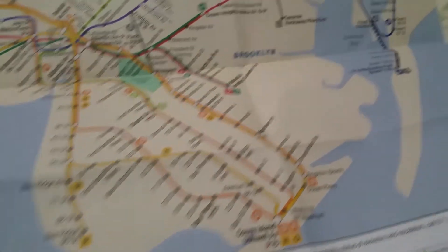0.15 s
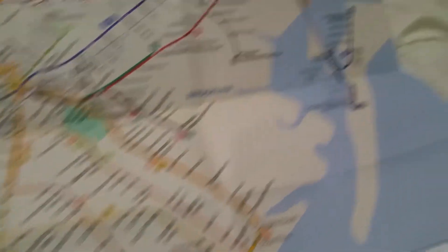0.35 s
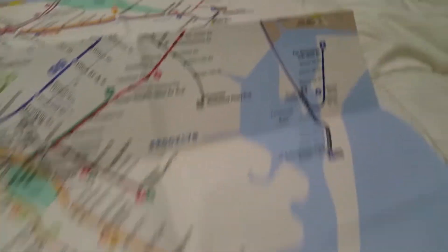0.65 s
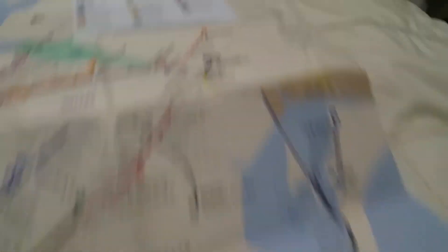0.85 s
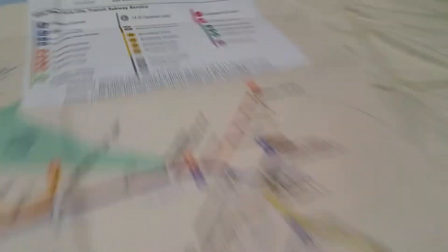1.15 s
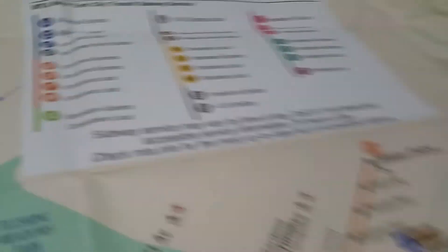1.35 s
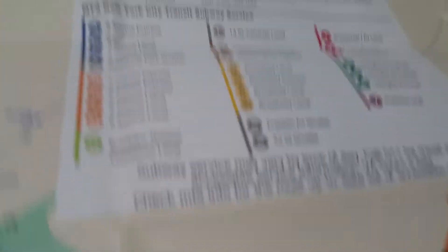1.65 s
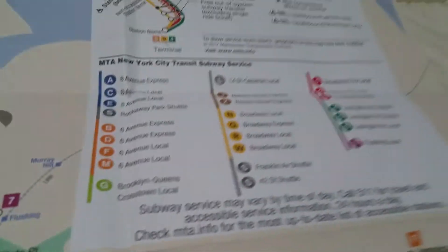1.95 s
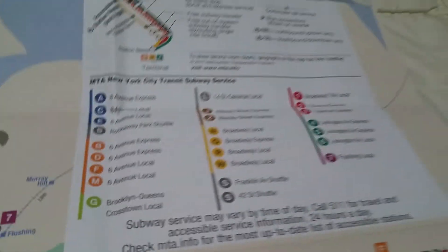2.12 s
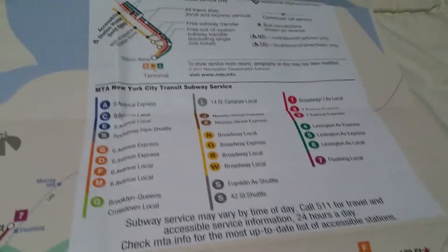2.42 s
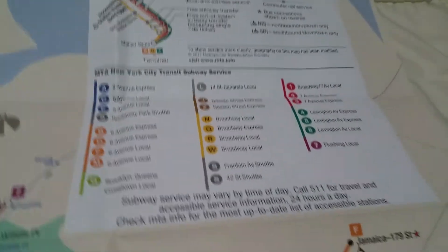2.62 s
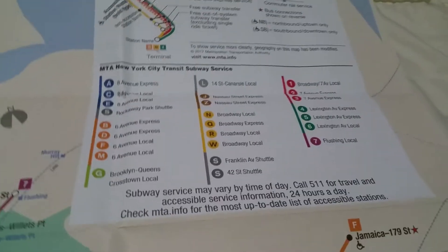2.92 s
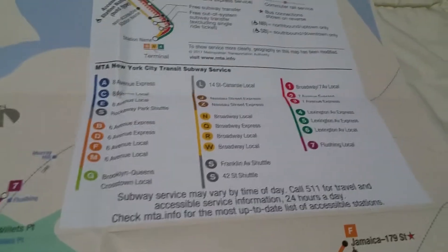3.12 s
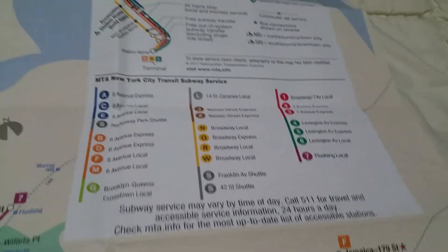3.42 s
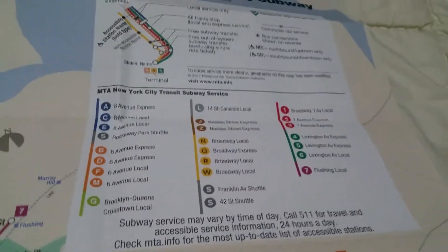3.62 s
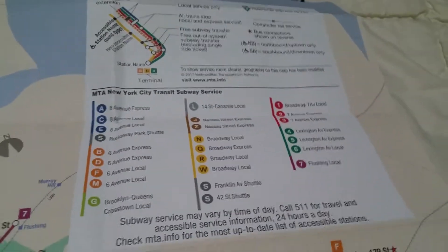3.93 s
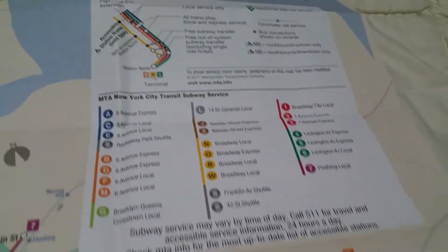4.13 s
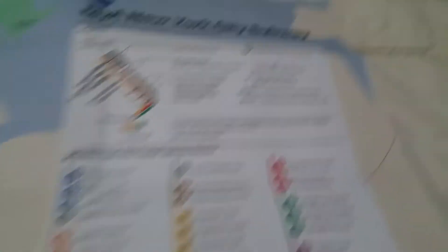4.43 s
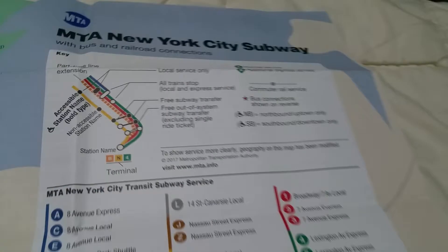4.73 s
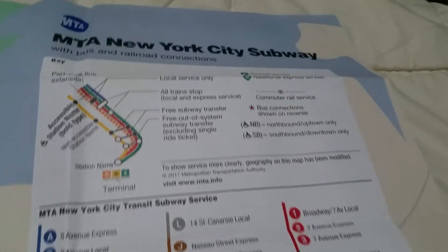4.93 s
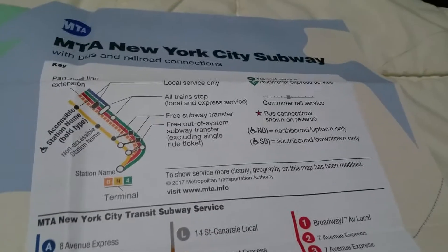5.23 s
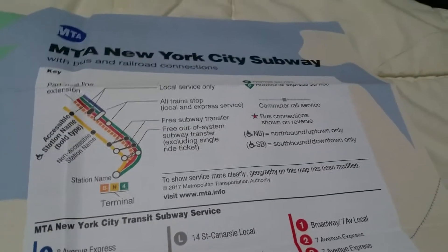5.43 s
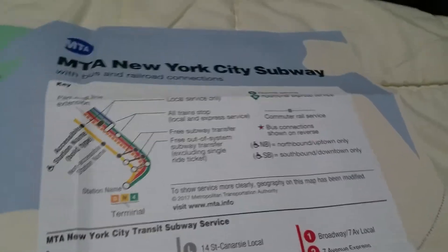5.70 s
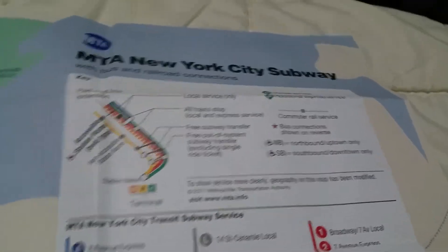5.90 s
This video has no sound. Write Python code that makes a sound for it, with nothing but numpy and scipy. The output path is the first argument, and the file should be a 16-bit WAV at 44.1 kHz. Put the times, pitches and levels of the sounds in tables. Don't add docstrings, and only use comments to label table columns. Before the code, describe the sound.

A big folded paper sheet is handled on a quilt in a quiet bedroom. Soft rustling and low air puffs lead to a sharp crack just after one second, then a hollow, booming crumple and several crisp snaps until about two seconds. Afterwards only small crinkles and ticks break the low room rumble and faint hiss. Close hand-held stereo pickup, fairly dry, with very faint wall echoes.

```python
import sys
import numpy as np
from scipy import signal
from scipy.io import wavfile
from scipy.ndimage import uniform_filter1d

SR = 44100
rng = np.random.default_rng(int(sys.argv[2]) if len(sys.argv) > 2 else 0)


def invert_db(x):
    u = np.asarray(x, float) / 20
    return 10 ** u


def generate_wav(sig):
    pcm = np.round(np.clip(np.atleast_2d(sig).T, -1, 1) * 32767).astype(np.int16)
    wavfile.write(sys.argv[1], SR, pcm)


N = 267290

# (frequency [Hz], likeness [-1 to 1])
NEAR = [(100, 0.93), (400, 0.9), (1000, 0.54), (2500, 0.14), (6000, 0.19), (14000, 0.12)]
# (time [s], left-right balance [dB])
PLACE = [(0, -2.5), (.6, 1), (.81, -3.5), (1.0, -0.5), (1.09, 3.5), (1.2, -0.5), (1.26, 2.5), (1.45, 0.33),
         (1.63, -3), (1.79, 2), (2.15, -0.5), (2.4, 0.8), (2.77, -0.9), (3.5, 0), (3.9, -1), (4.5, 0),
         (5.08, -2), (5.75, -2)]


def evened(x):
    return x / np.sqrt(np.mean(x ** 2) + 1e-20)


def read(points, hz):
    f, value = np.transpose(points)
    return np.interp(np.log(hz + 1), np.log(f + 1), value)


def add(mix, s, sound):
    part = mix[..., max(round(s * SR), 0):][..., :sound.shape[-1]]
    part += sound[..., :part.shape[-1]]


def resonate(x, hz, width):
    turn = np.exp(2j * np.pi * np.cumsum(hz * np.ones(x.shape[-1])) / SR)
    r = np.exp(-np.pi * width / SR)
    return 2 * (turn * signal.lfilter([1 - r], [1, -r], x / turn)).real


def placed(pair, pan_db):
    spacing_s = .00043
    lag = round(spacing_s * SR * np.tanh(np.mean(pan_db) / .8))
    pair = pair * invert_db(np.outer([.5, -.5], pan_db))
    return np.array([np.roll(pair[0], max(-lag, 0)), np.roll(pair[1], max(lag, 0))])


def balance(s):
    return np.interp(s, *np.transpose(PLACE))


def diffuse(source, colour, likeness, patchy_db, size):
    hz, t, (a, b) = signal.stft(source, SR, nperseg=size, noverlap=size * 3 // 4)
    patches = uniform_filter1d(rng.standard_normal(a.shape), size // 64, 0)
    patches = evened(uniform_filter1d(patches, 16, 1))
    same = np.clip(read(likeness, hz), -1, 1)[:, None]
    pair = np.array([a, same * a + np.sqrt(1 - same ** 2) * b])
    pair = pair * invert_db(read(colour, hz)[:, None] + patchy_db * patches)
    return evened(signal.istft(pair, SR, nperseg=size, noverlap=size * 3 // 4)[1][:, :N])


def room_tone():
    # (frequency [Hz], level [dB per Hz])
    quiet = [(12, -35), (20, -24), (40, -18), (60, -9), (107, 2.5), (204, -12), (337, -12.5), (520, -18),
             (900, -21), (2530, -28.5), (4800, -34), (6500, -31), (8500, -35), (16000, -37)]
    # (frequency [Hz], likeness [-1 to 1])
    likeness = [(60, 0.97), (130, 0.95), (290, 0.67), (640, 0.25), (1410, -0.28), (3100, -0.094),
                (6820, -0.1), (15000, -0.04)]
    tone = diffuse(rng.standard_normal((2, N)), quiet, likeness, patchy_db=0.8, size=1024)
    return invert_db(-62 + np.array([[.6], [-.6]])) * tone


def bedroom(x):
    # (frequency [Hz], decay by 60 dB [s])
    walls = [(200, 0.23), (1000, 0.07), (4000, 0.33), (12000, 0.25)]
    taps = np.zeros((2, SR // 2))
    at = np.arange(260, SR // 2 - 20, 20) + rng.integers(0, 20, (2, (SR // 2 - 261) // 20))
    np.put_along_axis(taps, at, rng.choice([-1., 1.], at.shape), 1)
    hz, t, z = signal.stft(taps, SR, nperseg=256)
    tail = signal.istft(z * invert_db(-60 * t / read(walls, hz)[:, None]), SR, nperseg=256)[1]
    return signal.fftconvolve(x, tail / np.linalg.norm(tail[0]), axes=1)[:, :N]


def puff(db, hz, t60):
    t = np.arange(6000) / SR
    rise = 0.069 * t60
    swing = -np.sin(2 * np.pi * hz * t) * invert_db(db - 60 * t / max(t60, .01))
    swing = swing * np.minimum(t / max(rise, .001), 1)
    swing = signal.lfilter(*signal.butter(2, 70, "high", fs=SR), swing)
    return swing * invert_db(np.array([[2.4], [2.1]]))


def puffs():
    # (time [s], peak level [dB], pitch [Hz], ring t60 [s])
    swings = [
        (0.045, -44, 146.2, 0.3),
        (0.628, -42, 109, 0.036),
        (0.666, -67.5, 116, 0.038),
        (0.698, -33.5, 107, 0.011),
        (0.73, -41, 175, 0.025),
        (0.872, -26.5, 161, 0.013),
        (0.944, -27, 132, 0.011),
        (0.969, -34.5, 102.7, 0.047),
        (4.011, -44, 139.3, 0.21),
    ]
    out = np.zeros((2, N))
    for s, db, hz, t60 in swings:
        add(out, s, puff(db, hz, t60))
    return out


def knocks():
    # (time [s], peak level [dB], pitch [Hz], ring
    # t60 [s])
    drum_notes = [(.045, -50, 578, 0.23), (0.049, -52.5, 217.5, 0.34), (0.171, -52, 197, .12),
                  (1.067, -42, 420, 0.036), (1.075, -44, 800, 0.044), (1.083, -40, 700, 0.029),
                  (1.2585, -27.5, 7040, 0.008), (1.2592, -21, 3300, .012), (1.2595, -26, 800, .02),
                  (1.2792, -30, 2700, .015), (1.264, -34, 1897, 0.018), (1.448, -32.5, 584, 0.18),
                  (1.452, -37.5, 784, 0.18), (1.459, -25.5, 399, 0.16), (1.461, -31, 686, 0.042),
                  (1.477, -38, 444, 0.058), (1.486, -33, 400.4, 0.16), (1.504, -34, 760, 0.06),
                  (1.4785, -30, 620, .03), (1.489, -29, 704, .025), (1.5095, -30, 595, 0.057),
                  (1.521, -32, 720, .05), (1.5455, -32, 900, 0.033), (1.4595, -35, 2000, .02),
                  (1.533, -34, 585.5, 0.15), (1.536, -32.5, 1890, 0.065), (1.543, -36, 420, 0.14),
                  (1.556, -33, 590, 0.077), (1.59, -32.5, 800, 0.074), (1.5, -43.5, 143.7, 0.86),
                  (2.152, -33, 365, 0.17), (2.157, -39, 599, 0.17), (2.762, -45, 570, 0.14),
                     (2.78, -50.5, 217.3, 0.28), (2.763, -61, 3130, 0.07), (3.634, -56, 334, 0.13),
                     (3.968, -53, 710, 0.086), (3.991, -47, 150, .2), (1.2325, -26, 760, 0.013),
                     (1.2375, -27.5, 580, 0.03), (1.205, -31.5, 910, 0.038), (2.1535, -28.5, 3070, 0.035),
                     (2.175, -35, 380, .07), (2.149, -34, 520, .05), (2.166, -32, 480, .05),
                     (3.713, -35.5, 2640, 0.019), (3.894, -51, 1510, 0.035), (1.0765, -33, 890, .03),
                     (1.086, -34, 760, .03), (1.096, -34, 720, .08), (.039, -55, 900, .03),
                     (3.9695, -53, 800, .03), (2.3365, -52, 800, .03), (4.799, -57, 650, 0.041),
                     (5.077, -51, 216, 0.19), (5.09, -52, 292, 0.23), (5.095, -46.5, 430, 0.28),
                     (5.824, -58.5, 700, .02)]
    out = np.zeros((2, N))
    for s, db, hz, t60 in drum_notes:
        add(out, s, placed(puff(db, hz, t60), balance(s)))
    return out


def snap(db, hz, edge_db, shiver_db, pan_db):
    t = np.arange(-300, 4000) / SR
    after = np.maximum(t, 0)
    flip = np.cos(2 * np.pi * hz * t - .3) + .35 * np.sin(4 * np.pi * hz * t)
    flip = flip * np.exp(-(t * hz / .7) ** 2)
    noise = rng.standard_normal((3, 2, len(t)))
    bands_hz = [[hz * .5, min(hz * 2.5, 4200)], [220, 800], [2600, 7500]]
    high, low, sharp = (evened(signal.lfilter(*signal.butter(2, band_hz, "band", fs=SR), n))
                        for band_hz, n in zip(bands_hz, noise))
    high = high * invert_db(-60 * after * hz / 35)
    low = invert_db(4.0) * low * np.sqrt(700 / hz) * invert_db(-60 * after / 0.053)
    shiver = (high + low) * np.sin(np.pi / 2 * np.clip(t * hz, 0, 1)) ** 2
    shiver = signal.lfilter(*signal.butter(3, min(hz * 2.75, 5200), fs=SR), shiver)
    sharp = (sharp + .25 * noise[0]) * invert_db(-60 * after / .005) * np.exp(np.minimum(t, 0) / .0004)
    return placed((flip + invert_db(shiver_db) * shiver + invert_db(edge_db + 4) * sharp) * invert_db(db), pan_db)


def creases():
    # (time [s], peak level [dB], pitch [Hz], shiver level [dB], left-right balance [dB])
    crisp = [(1.193, -31.5, 1190, -15, 8), (1.2245, -31, 1140, -20, 1.5), (1.754, -46, 1830, -9, -5),
             (1.855, -46, 590, -26, 0), (1.957, -31, 674, -23, 0.5), (2.064, -51, 586, -12.5, 1.5),
             (2.079, -55.5, 930, -3, -5), (2.151, -17.5, 3050, -15, 4.5), (2.335, -45.5, 676, -5.5, 3.5),
             (3.644, -77, 815, -22, 9), (3.968, -68, 729, -19, 2), (4.797, -59, 611, -11, -1.5),
             (5.468, -56, 515, -22, 0.5), (5.815, -58, 900, 3, 0)]
    # (time [s], peak level [dB], pitch [Hz], shiver level [dB], left-right balance [dB])
    dull = [(1.0897, -17, 770, -25, 3.5), (1.205, -31, 1250, -5, 9), (1.2315, -22, 770, -10, 2.5),
            (1.237, -33, 540, -9, -2), (1.2775, -28, 2300, -8.5, -1), (1.7795, -22.5, 850, -20, 3),
            (3.711, -35.5, 2010, -2, 0), (3.844, -60, 443, -30, 0), (3.892, -35, 1110, -9.5, 0),
            (4.04, -36, 1220, -2.5, 2), (4.442, -34, 1160, -4.5, 1)]
    # (time [s], peak level [dB], pitch [Hz], shiver level [dB], left-right balance [dB])
    fold = (1.2574, -10, 1900, -20, 5)
    lead_s = 200 / 44100
    out = np.zeros((2, N))
    for rows, edge_db in (crisp, -28), (dull, -45), ([fold], -24):
        for s, db, hz, shiver_db, pan_db in rows:
            add(out, s - lead_s, snap(db, hz, edge_db, shiver_db, pan_db))
    return out


def crackle(per_s, spread_db, smooth):
    slips = (rng.random((2, N)) < per_s / SR) * rng.standard_normal((2, N))
    slips *= invert_db(spread_db * np.minimum(rng.exponential(1, (2, N)), 4))
    return evened(slips) + smooth * rng.standard_normal((2, N))


def stroke(grain, start, db, rise, fade, *hz):
    rise, fade = max(rise, .002), max(fade, .03)
    at = np.arange(round(start * SR), min(round((start + rise + fade) * SR), N))
    t = at / SR - start
    shape = np.clip(t / rise, 0, 1) ** 1.58 * invert_db(db - 60 * np.maximum(t - rise, 0) / fade)
    sound = evened(grain(at, *hz) * shape) * np.sqrt(np.mean(shape ** 2))
    return at[0] / SR, placed(sound, balance(start + rise))


def strokes(rows, grain):
    out = np.zeros((2, N))
    for row in rows:
        add(out, *stroke(grain, *row))
    return out


def pushes():
    # (frequency [Hz], level [dB per Hz])
    air_colour = [(40, -45), (70, -12), (120, -2), (200, -4.5), (300, -8.5), (500, -41.5)]
    # (start [s], strength [dB], rise [s], time to fade 60 dB [s])
    gusts = [(.034, -53, 0.054, 0.6), (.4, -67.5, 0.043, 1), (.53, -59, 0.14, 1), (.8, -57.5, 0.096, 2),
             (.95, -57, 0.13, -0.5), (1.066, -41, 0.014, 0.2), (1.14, -48, 0.072, -0.5),
             (1.21, -46, 0.022, .5), (1.446, -48, 0.0049, 1.2), (1.72, -59.5, 0.083, 1),
             (2.06, -56, 0.031, 0.4), (2.13, -57.5, 0.047, 0.29), (2.3, -75.5, 0.026, 1),
             (2.53, -62, 0.064, 0.1), (2.763, -58.5, 0.0079, .5), (3.62, -61.5, 0.092, 1),
             (3.88, -54.5, 0.17, 0.4), (4.38, -69.5, 0.024, 3.5), (5.075, -55.5, 0.005, .5),
             (5.9, -69, .04, 3)]
    push = diffuse(crackle(150, 4.0, 1.05), air_colour, NEAR, 1.2, size=1024)
    return strokes(gusts, lambda at: push[:, at])


def sliding_grain():
    # (frequency [Hz], level [dB per Hz])
    hiss_colour = [(2500, -6.5), (3800, -4.5), (5500, -4.5), (7000, -5.5), (7800, -14), (11000, -15.5),
                   (15500, -20)]
    slide = diffuse(crackle(6000, 2.6, 1.8), hiss_colour, NEAR, 1.4, size=256)
    return lambda at: slide[:, (at + 7 * at[0]) % N]


def slides(slid):
    # (start [s], strength [dB], rise [s], time to fade 60 dB [s])
    swipes = [(.03, -60, 0.015, 0.4), (.55, -66.5, 0.1, 0.36), (.8, -65.5, 0.012, 0.5),
              (.85, -53.5, 0.3, 1.2), (1.066, -52, 0.004, 1.2), (1.09, -62, 0.023, 0.5),
              (1.2, -54, 0.03, 0.6), (1.25, -52.5, 0.085, 0.1), (1.39, -58.5, 0.062, 0),
              (1.446, -48.5, 0.0067, 1.25), (1.604, -45.5, 0.014, 0.73), (1.72, -53, 0.07, 0.5),
              (1.855, -54, 0.04, 1.8), (2.06, -55, 0.0091, -0.5), (2.098, -50, 0.0084, 0.5),
              (2.148, -48.5, 0.0045, 0.45), (2.16, -75, .011, -8), (2.3, -65, 0.13, 2.5),
              (2.61, -62, 0.027, -0.05), (2.763, -59, 0.0073, .5), (3.44, -65.5, 0.089, -1.16),
              (3.85, -72.5, 0.043, 11.5), (4.4, -73, 0.026, 0.2), (5.072, -53, 0.007, 0.25),
              (5.09, -62, 0.019, 0.6), (5.735, -64, 0.0078, 0.33), (5.9, -73, 0.071, 1.5)]
    return strokes(swipes, slid)


def rustling_grain():
    # (frequency [Hz], level [dB per Hz])
    rustle_colour = [(600, -13.5), (1000, -2.5), (1500, -8.5), (2500, -10), (3500, -6.5), (5500, -13.5),
                     (7500, -41)]
    return diffuse(crackle(1500, 2.8, .7), rustle_colour, NEAR, 1.5, size=256)


def rubs(rustle, slid):
    # (start [s], strength [dB], rise [s], time to fade 60 dB [s], pitch [Hz])
    rubbings = [(2.762, -55.5, 0.004, 0.3, 3000), (2.77, -63, 0.014, .45, 2600),
                (5.07, -62, .008, .15, 10500), (0.94, -71, 0.168, -0.3, 1700), (0.87, -65, .01, 0, 1160),
                (2.2, -65, 0.014, -0.3, 2930), (5.93, -71, 0.04, 0, 6630),
                (1.258, -35.5, 0.0024, 0.04, 2900), (2.1, -53, .012, 0.25, 6500),
                (2.102, -52, 0.023, 0.17, 5150), (2.172, -42, .005, .08, 2300),
                (2.14, -47, .006, 0.07, 2300), (5.074, -56, 0.0093, 0.18, 6000),
                (5.077, -61.5, 0.012, .28, 2880), (5.74, -64, 0.011, 0.2, 790),
                (1.525, -43.5, 0.014, 0.23, 1900), (1.456, -44.5, .003, 0.25, 2900),
                (1.61, -46, 0.0086, .35, 6000), (1.612, -50.5, 0.016, .2, 4200),
                (1.47, -50.5, .01, .5, 4800), (3.893, -53, .003, 0.1, 1750), (3.862, -66, 0.011, 0.3, 2500),
                (0.033, -64, 0.032, .5, 4470)]

    def rubbed(at, hz):
        band_hz = .33 * hz
        return resonate(resonate(rustle[:, at] + slid(at), hz, band_hz), hz, band_hz)

    return strokes(rubbings, rubbed)


def rustles(rustle):
    # (start [s], strength [dB], rise [s], time to fade 60 dB [s], pitch [Hz])
    swishes = [(.03, -56, 0.039, 0.53, 1670), (.5, -65.5, 0.094, 1, 1640), (.795, -55.5, 0.0064, 1.6, 1170),
               (.83, -52, .23, -1, 1660), (1.066, -42.5, 0.0098, 0.7, 1130), (1.12, -66, 0.092, -6, 1250),
               (1.203, -39, 0.004, 0.07, 1270), (1.222, -36, 0.018, 0.18, 1150),
               (1.26, -34.5, 0.0036, 0.04, 2290), (1.278, -46, .003, .18, 1300),
               (1.445, -34.5, 0.0083, 0.7, 1290), (1.505, -38.5, 0.028, 0.57, 1500),
               (1.56, -45, .035, .15, 1600), (1.6, -53, 0.0077, -2, 1650), (1.73, -52, 0.03, 0.8, 1600),
               (1.87, -67, 0.19, -1, 1440), (2.06, -56, 0.01, 0.1, 1760), (2.095, -51.5, 0.041, 0.21, 1960),
               (2.151, -38, 0.004, 0.2, 2300), (2.33, -70, 0.049, 15, 1500), (2.61, -74, 0.015, 1.4, 1300),
               (2.763, -53, 0.0073, 0.71, 2450), (3.44, -65, 0.07, -0.6, 1760),
               (3.8, -64.5, 0.17, -0.05, 1314), (5.075, -53, 0.008, 0.5, 1946),
               (5.735, -61, .01, 0.3, 4200)]
    # (start [s], strength [dB], rise [s], time to fade 60 dB
    # [s], pitch [Hz])
    further = [(.028, -60.5, 0.01, 0.53, 2930), (2.762, -53, 0.0057, 0.16, 1880),
               (3.715, -61, .011, 0.21, 2220), (3.86, -66.5, 0.018, 0.18, 2596),
               (4.045, -65, 0.015, 0.22, 2000), (4.45, -67.5, 0.017, 0.72, 2360),
               (5.15, -69, 0.016, 0.4, 1660), (.86, -69, 0.27, .15, 2180), (3.68, -68, 0.029, 0.078, 2970),
               (5.733, -59, 0.01, 0.42, 1160), (5.734, -61.5, 0.007, 0.41, 5170)]

    def pitched(at, hz):
        band = resonate(resonate(rustle[:, at], hz, 1590), hz, 1590)
        return evened(0.192 * rustle[:, at] + band)

    return strokes(swishes + further, pitched)


def bends():
    # (frequency [Hz], level [dB per Hz])
    boom_colour = [(88, -55.5), (150, -19), (291, -9.5), (404, -1), (459, -16.5), (776, -8.5), (1220, -9),
                   (1600, -12.5), (2080, -53), (3520, -120)]
    # (frequency [Hz], bandwidth [Hz], level [dB])
    modes = [
        (420, 27.8, -3),
        (570, 102, 2),
        (800, 16, 7),
    ]
    # (start [s], strength [dB], rise [s], time to fade 60 dB [s], pitch [Hz])
    flexings = [(.037, -54, 0.012, 0.57, 504), (.53, -63.5, 0.091, 1.5, 350), (.8, -53.5, 0.34, 1, 357),
                (1.062, -34.5, 0.028, -0.47, 692), (1.092, -41, 0.0034, 0.2, 750),
                (1.203, -40, 0.0039, 0.1, 634), (1.262, -57, 0.0091, -0.5, 530),
                (1.31, -62, 0.027, 0.5, 550), (1.446, -32.5, 0.0038, 0.7, 560),
                (1.495, -38, 0.025, 0.8, 650), (1.72, -68, 0.16, -2, 400), (1.87, -70, 0.14, 1, 533),
                (2.06, -50, 0.009, -0.2, 477), (2.115, -64, 0.031, 0.5, 457),
                (2.135, -39.5, 0.01, 0.2, 755), (2.202, -46, 0.0046, .2, 517),
                (2.155, -31, 0.0064, 0.06, 344), (2.53, -63.5, 0.11, -1, 503),
                (2.76, -53.5, 0.007, 0.53, 545), (3.45, -62.5, 0.026, 0, 450), (3.62, -79, 0.0054, 2, 435),
                (3.8, -60, 0.13, 0, 447), (4.4, -93, 0.26, -5, 440), (4.72, -68.5, 0.15, 0.2, 440),
                (5.076, -54, 0.013, 0.4, 422), (5.735, -58, 0.01, 0.4, 650)]
    # (start [s], strength [dB], rise [s], time to fade 60 dB [s], pitch [Hz])
    further = [
        (3.64, -70.5, 0.0025, 1.5, 410),
        (3.895, -52.5, 0.005, 0.34, 480),
        (3.967, -59, 0.004, 0.12, 700),
        (4.445, -63, 0.0089, 0.85, 329),
        (5.077, -55, 0.0075, 0.3, 240),
        (.08, -85, 0.094, -2, 594),
    ]
    flex = diffuse(crackle(1500, 2.6, .8), boom_colour, NEAR, 1.2, size=512)
    ringing = sum(invert_db(db) * signal.lfilter(*signal.iirpeak(hz, hz / width_hz, SR), flex)
                  for hz, width_hz, db in modes)
    flex = evened(flex + 0.38 * evened(ringing))

    def bent(at, hz):
        return evened(0.12 * flex[:, at] + resonate(flex[:, at], hz, 200))

    return strokes(flexings + further, bent)


def handling():
    rustle, slid = rustling_grain(), sliding_grain()
    return bends() + rustles(rustle) + rubs(rustle, slid) + slides(slid) + pushes()


def scene():
    snaps = creases()
    echoes = invert_db(-15.5) * bedroom(snaps)
    return room_tone() + puffs() + knocks() + snaps + echoes + handling()


def band_limit(x):
    return signal.sosfilt(signal.butter(12, 16450, fs=SR, output="sos"), x)


def record(dry):
    edge_hz = 15720
    lowpass = signal.firwin(511, edge_hz, window=("kaiser", 9), fs=SR)
    limited = signal.oaconvolve(dry, lowpass[None], "same")
    return band_limit(limited)


dry = scene()
out = record(dry)
generate_wav(out)
```